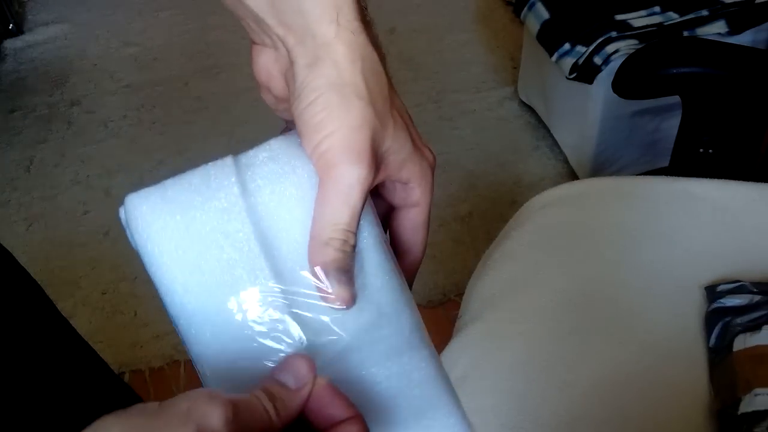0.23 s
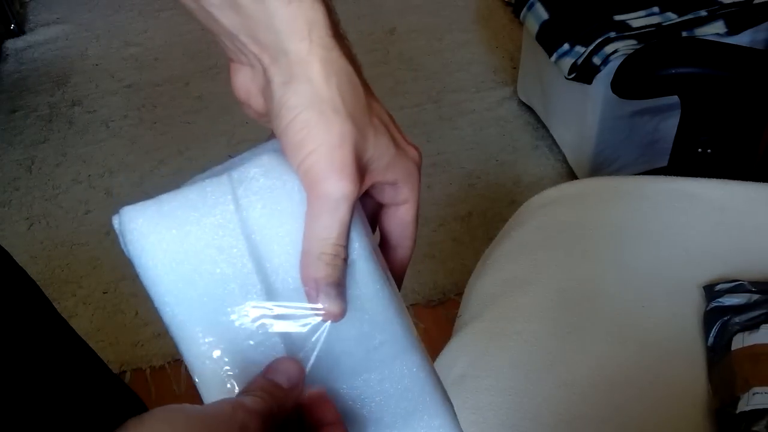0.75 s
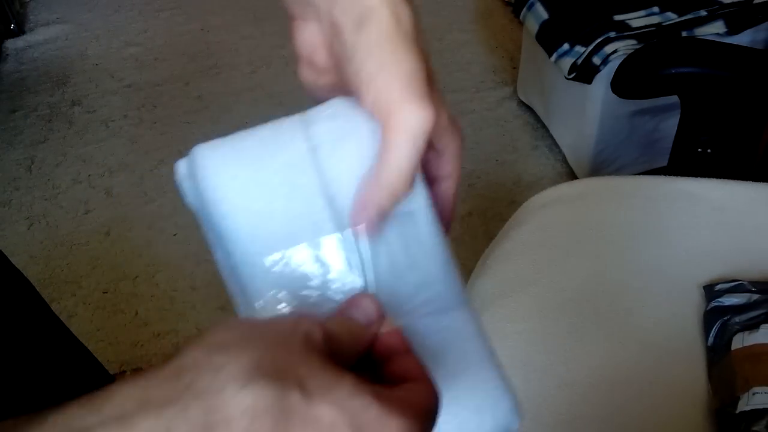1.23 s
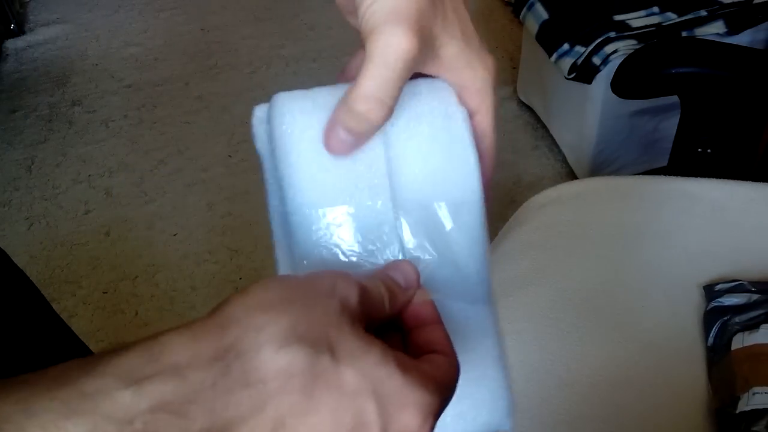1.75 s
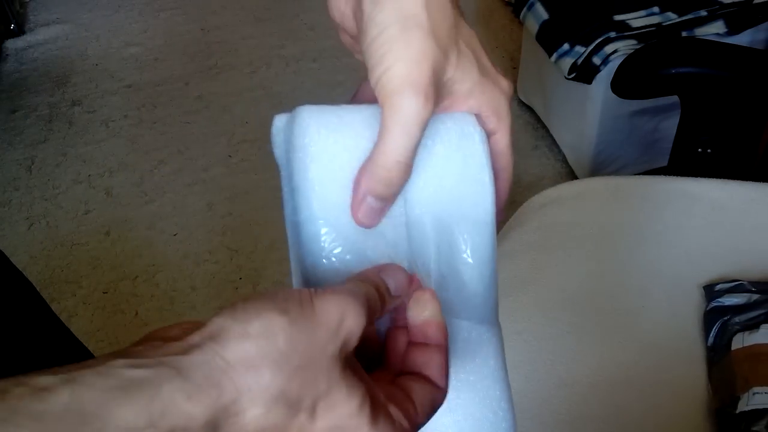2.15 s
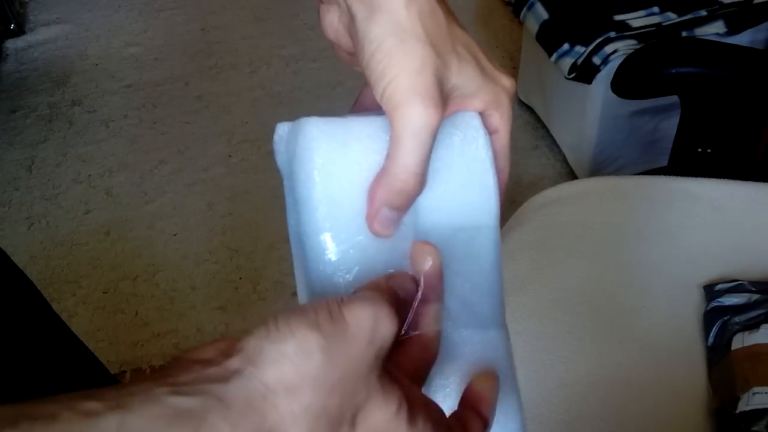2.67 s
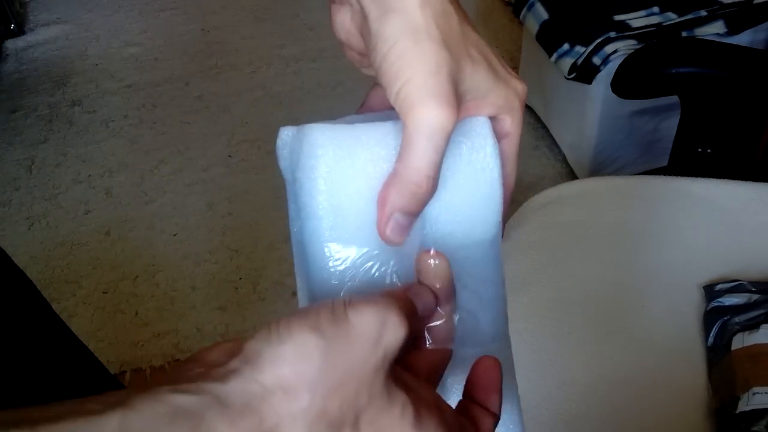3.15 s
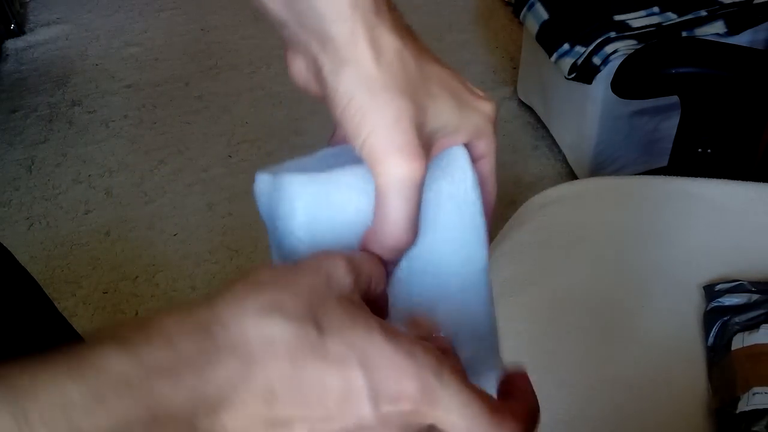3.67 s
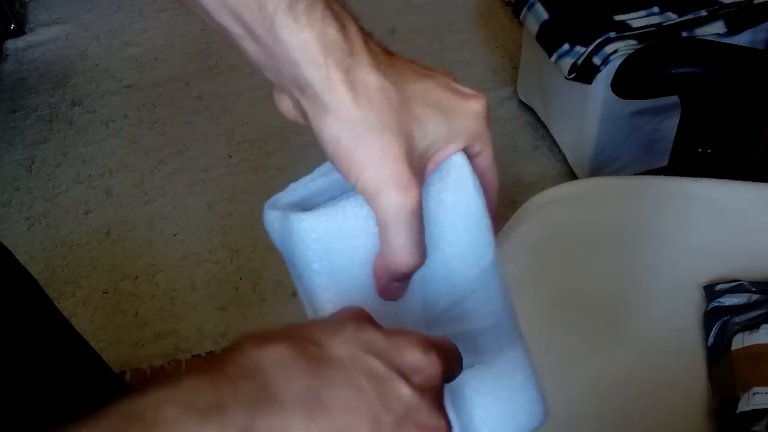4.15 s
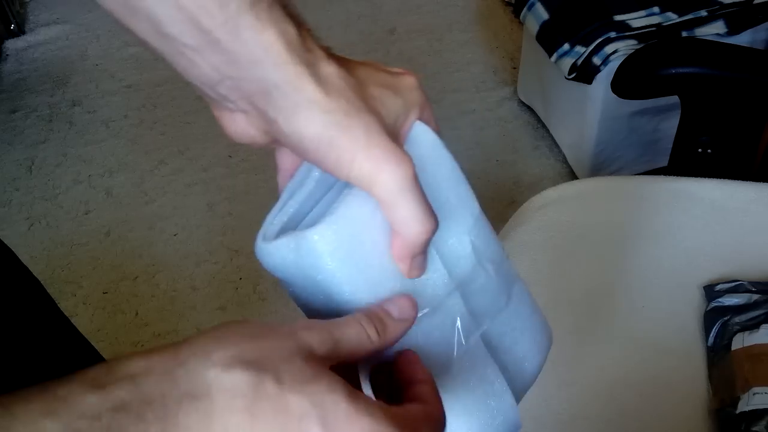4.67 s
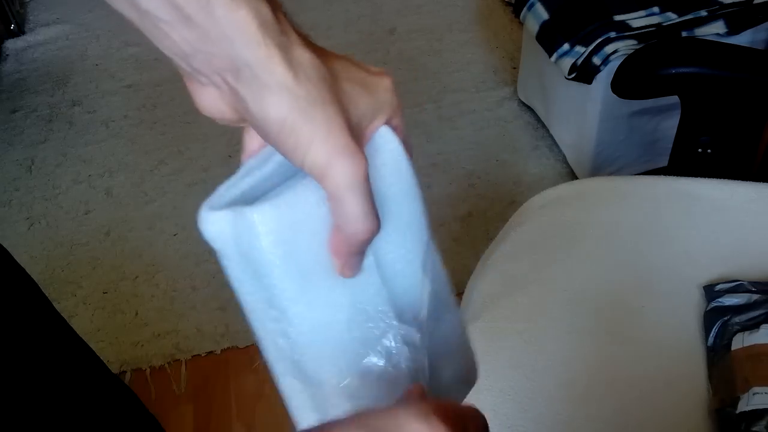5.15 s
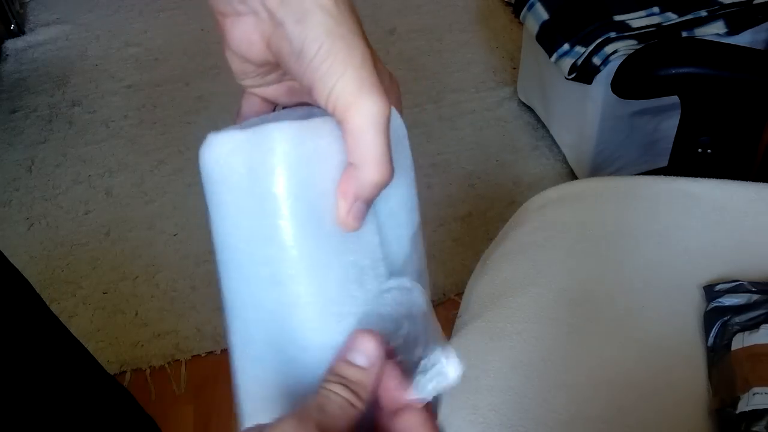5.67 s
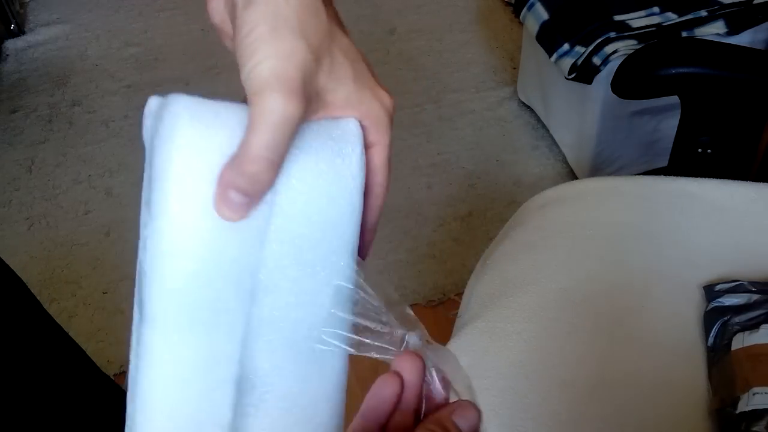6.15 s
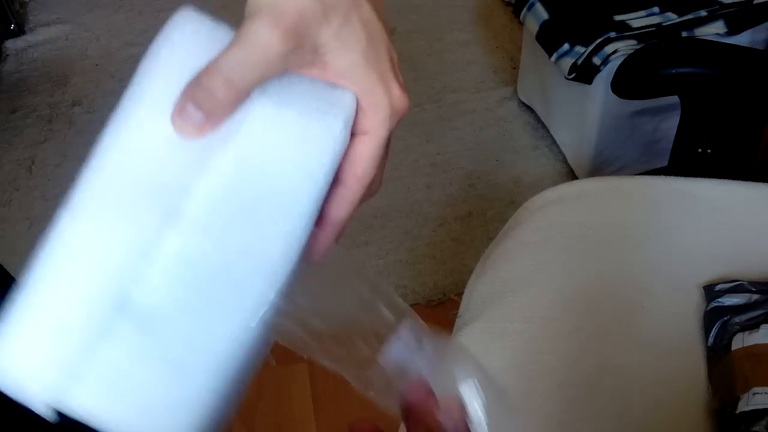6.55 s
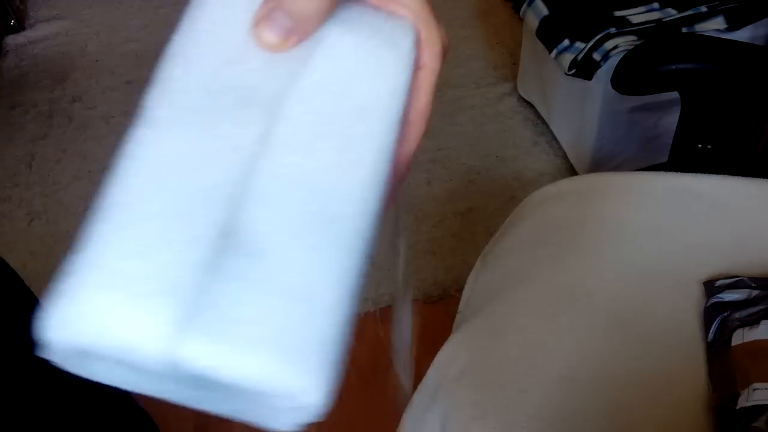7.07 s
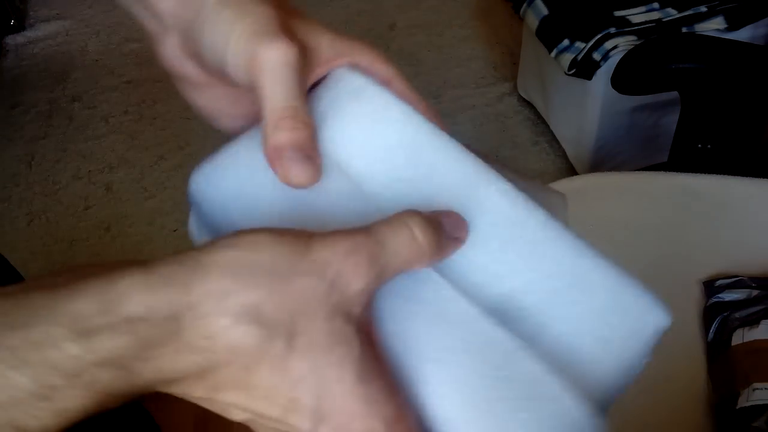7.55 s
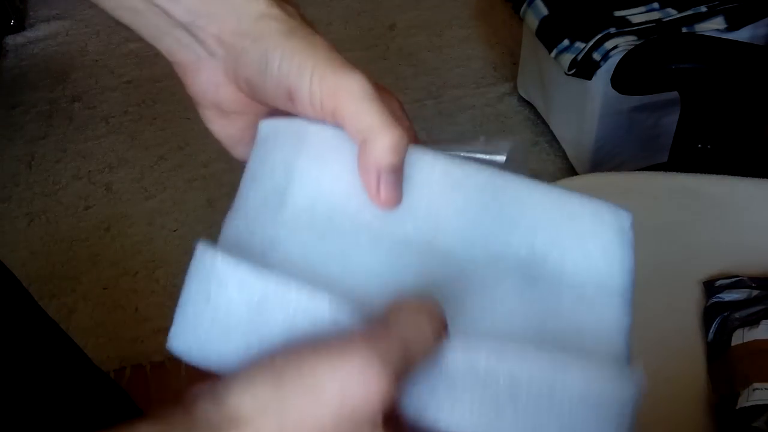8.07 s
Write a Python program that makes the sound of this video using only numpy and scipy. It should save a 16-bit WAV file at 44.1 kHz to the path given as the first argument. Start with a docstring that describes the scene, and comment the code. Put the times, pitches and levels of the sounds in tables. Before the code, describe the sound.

Close, uneven crackling and brief rips of tape pulled from foam packing, with soft hollow thumps in a small room.

```python
"""Peeling tape off a foam sleeve

A small soft-furnished room, a phone microphone half a metre from two hands peeling sticky tape.
The glue lets go in single snaps, loose crackle and dense rips; each release rings the tape film and
thumps the hollow sleeve. Nearby surfaces echo it about 10 ms later, over a quiet hiss."""
import sys
import numpy as np
from scipy import signal
from scipy.fft import rfft, irfft, next_fast_len
from scipy.io import wavfile
from scipy.ndimage import uniform_filter1d

SR = 44100
rng = np.random.default_rng(int(sys.argv[2]) if len(sys.argv) > 2 else 0)


def waveform_to_disk(signal):
    """Save audio, clipped to [-1, 1], as 16-bit WAV at the path in sys.argv[1]."""
    frames = np.transpose(np.atleast_2d(signal))
    scaled = np.clip(frames, -1, 1) * 32767
    samples = np.round(scaled).astype(np.int16)
    wavfile.write(sys.argv[1], SR, samples)


N = 366471


def undb(db):
    """Decibels to gain."""
    return 10 ** (np.asarray(db) / 20)


def highpass(x, hz):
    """Cut the bass at 18 dB per octave."""
    return signal.sosfilt(signal.butter(3, hz, "high", fs=SR, output="sos"), x)


def wander(per_s):
    """Random levels, each held 1 / per_s seconds and slewed; spread near 1."""
    hold = int(SR / per_s)
    return uniform_filter1d(np.repeat(rng.standard_normal(N // hold + 1), hold), hold // 2 + 1)[:N]


def ring(force, hz, width_hz):
    """One resonance whose pitch may move; a click of size 1 rings with a peak near 1."""
    turn = np.exp(2j * np.pi * np.cumsum(hz) / SR)
    # seen from the turning frame the ring is a plain decay
    return (turn * signal.lfilter([1], [1, -np.exp(-np.pi * width_hz / SR)], force / turn)).imag


# noise floor at the microphone: (frequency [Hz], relative spectral density [dB])
HISS_SPECTRUM = [(18, -30), (30, -3), (49, -4), (169, 2), (1270, -3), (1740, -3), (3910, -5), (6400, -8),
                 (8320, -38), (14100, -120)]


def hiss(rms_db=-69):
    """The steady, quiet noise floor under the handling."""
    hz, db = np.transpose(HISS_SPECTRUM)
    size = next_fast_len(N)
    bin_hz = np.maximum(np.arange(size // 2 + 1) * SR / size, 1)
    gain = undb(np.interp(np.log(bin_hz), np.log(hz), db))
    noise = irfft(rfft(rng.standard_normal(size)) * gain, size)[:N]
    return undb(rms_db) * noise / np.std(noise)


# surfaces close to the hands and the microphone: (delay [s], level [dB])
NEAR_ECHOES = [(.0011, -16), (.0017, -22.5), (.0045, -22), (.009, -15), (.011, -14)]
# low, middle and high band of the room's tail: (frequency [Hz], time to fall 60 dB [s], level [dB])
ROOM_TAIL = [(250, 0.15, -6.5), (1120, 0.24, -14), (3200, 0.19, -4.5)]


def reflections():
    """The room's answer at the microphone: a few near echoes and a short diffuse tail."""
    t = np.arange(SR // 3) / SR
    response = np.zeros(len(t))
    for delay, db in NEAR_ECHOES:
        response[int(delay * (1 + .04 * rng.standard_normal()) * SR)] += undb(db)
    build_up = np.clip(t / .0044, 0, 1) ** 2
    for kind, (hz, t60, db) in zip(("low", "band", "high"), ROOM_TAIL):
        edges = {"low": hz * 2, "band": [hz / 2, hz * 2], "high": hz / 2}[kind]
        band = signal.butter(2, edges, kind, fs=SR, output="sos")
        tail = signal.sosfilt(band, rng.standard_normal(len(t))) * undb(-60 * t / t60) * build_up
        response += tail * undb(db) * np.sqrt(2 * np.log(1000) / (t60 * SR))
    return response


def room(direct, block=8192):
    """The hands keep moving, so about every fifth of a second meets a new pattern of reflections."""
    at_mic = np.concatenate([direct, np.zeros(SR)])
    for i in range(0, N, block):
        echo = signal.fftconvolve(direct[i:i + block], reflections())
        at_mic[i:i + len(echo)] += echo
    return at_mic[:N]


# the sleeve jerks in the hand: (time [s], level of the push [dB])
HAND_PUSHES = [(1.484, -53), (3.199, -55), (3.962, -44.5), (5.52, -57), (6.006, -46), (6.019, -48),
               (6.625, -49), (6.812, -44), (6.861, -35), (7.242, -45), (7.679, -61), (7.741, -54),
               (7.878, -48)]
# slow flexing of the whole sleeve: (frequency [Hz], bandwidth [Hz], level [dB])
FLEX_MODES = [(124, 54, -3), (187, 75, 0.5)]


def sleeve_jerks(push_s=.0037):
    """A soft push of the hand sets the whole sleeve flexing."""
    force = 1e-9 * rng.standard_normal(N)
    push = np.hanning(int(push_s * SR))
    for s, db in HAND_PUSHES:
        start = int(s * SR)
        force[start:start + len(push)] += undb(db) * push / push.sum()
    flex = sum(undb(db) * ring(force, np.full(N, hz), width) for hz, width, db in FLEX_MODES)
    return highpass(highpass(flex, 110), 80)


# the sleeve's pitch follows the grip and the place where the tape pulls: (time [s], pitch [Hz])
SLEEVE_PITCH = [(0, 500), (2.7, 593), (3.999, 465), (4.72, 425), (5.25, 620), (5.37, 470), (5.98, 370),
                (6.38, 624), (6.84, 403), (8.3, 414)]
# ring of the hollow sleeve: (multiple of its pitch [ratio], bandwidth [Hz], level [dB])
SLEEVE_MODES = [(.7, 135, -7), (1, 195, 2), (1.4, 288, -3.5)]


def sleeve_thumps(at, forces, thump_db):
    """Each click thumps the hollow foam, which is too small to radiate bass."""
    pitch_hz = np.interp(np.arange(N) / SR, *np.transpose(SLEEVE_PITCH))
    sleeve = np.zeros(N)
    for (multiple, width, db), force in zip(SLEEVE_MODES, forces):
        clicks = np.bincount(at, force * undb(db + thump_db), N)[:N]
        sleeve += ring(clicks, multiple * pitch_hz, width)
    return highpass(sleeve, 269)


# ring of the stretched tape film: (frequency [Hz], bandwidth [Hz], level [dB])
FILM_MODES = [(1020, 680, -3), (1610, 640, -5), (2560, 730, -2), (3195, 960, -7), (3985, 610, -3.5),
              (5510, 1700, -8), (5900, 850, -3)]


def film_ring(at, forces, treble_db):
    """Each click rings the thin film; its tension changes, so the pitch wanders."""
    film = np.zeros(N)
    for (hz, width, db), force in zip(FILM_MODES, forces):
        treble_share = np.clip(np.log(hz / 2000) / np.log(5700 / 2000), 0, 1)
        clicks = np.bincount(at, force * undb(db + treble_share * treble_db), N)[:N]
        film += ring(clicks, hz * np.exp(.073 * wander(per_s=23)), width)
    return highpass(film, 1000)


# fingers rubbing foam and tape: (time [s], level [dB])
FINGER_RUB = [(0.0, -71.5), (0.42, -76.5), (0.67, -82.5), (1.55, -73.5), (1.75, -65), (1.9, -91),
              (2.16, -69), (2.75, -89), (3.3, -66.5), (3.89, -75), (4.75, -76.5), (5.85, -80), (6.11, -73),
              (6.5, -72), (6.74, -57), (6.94, -91), (7.85, -74.5), (8.31, -80)]
# dense rips of tape: (start [s], rise [s], length [s], level [dB], sleeve thump re that level [dB])
TAPE_RIPS = [(0.12, 0.01, 0.047, -52, -26), (0.207, .01, .1, -65, -27), (0.337, .01, 0.1, -56.5, -33),
             (.45, .01, 0.16, -59.5, -30), (1.23, .008, 0.15, -58.5, -37), (1.971, 0.0083, 0.012, -56, -4),
             (2.594, .01, 0.031, -51, -12.5), (2.89, 0.0036, 0.04, -48, -20),
             (3.12, 0.024, 0.16, -62.5, -17), (3.413, .004, 0.029, -42.5, -20),
             (3.817, .006, 0.2, -56, -17), (3.96, 0.0068, 0.033, -48.5, -4.5),
             (4.302, .01, 0.082, -42.5, -31), (4.439, .01, 0.14, -54.5, -35), (4.648, .01, 0.16, -57, -23),
             (5.024, 0.016, 0.046, -58, -14), (5.198, .005, 0.037, -52.5, -23),
             (5.227, 0.051, .18, -34.5, -11.5), (5.895, .01, 0.067, -56, -16),
             (5.954, 0.012, 0.082, -43, 0.5), (6.27, .01, 0.11, -59.5, -16),
             (6.559, 0.095, 0.13, -51.5, -15.5), (6.75, 0.033, 0.1, -42.5, -10.5),
             (6.796, 0.028, 0.082, -30, -7.5), (7.182, 0.079, 0.087, -49.5, -13.5),
             (7.731, 0.035, 0.25, -63.5, -13.5), (8.227, 0.073, .1, -62, -9)]


def crackle(clicks_per_s=3000, rub_thump_db=-13.5, rub_dulling_db=6.5):
    """Tiny clicks: fairly even while fingers rub the foam, in rough flurries while tape rips."""
    t = np.arange(N) / SR
    rub = undb(np.interp(t, *np.transpose(FINGER_RUB)))
    film_drive, sleeve_drive = rub.copy(), rub * undb(rub_thump_db)
    for start, rise, length, db, thump_db in TAPE_RIPS:
        # a rip catches at once, swells, holds and fades
        held = (rise + length) / 2
        swell = np.interp(t - start, [0, .002, rise, held, length], [0, .29, 1, 1, 0]) * undb(db)
        film_drive += swell
        sleeve_drive += swell * undb(thump_db)
    at = np.flatnonzero(rng.random(N) < clicks_per_s / SR)
    rub_share = rub / film_drive
    # slow peeling stutters in single ticks, a fast rip evens out and brightens
    speed_db = 20 * np.log10(film_drive) + 60
    rough_db = 1.2 + (1 - rub_share) * np.clip(2.7 - .048 * speed_db, 0, 2.8)
    power_trim = np.sqrt(1 - rough_db * np.log(10) / 10)  # offsets the power that roughness adds
    flurry = .7 * wander(per_s=90)
    spikes = np.minimum(rng.exponential(size=N), 5.5)
    size = film_drive * power_trim * undb(rough_db * (spikes + flurry))
    thump_db = 20 * np.log10(sleeve_drive / film_drive)
    treble_db = .099 * speed_db - rub_dulling_db * rub_share  # skin on foam is duller than tearing glue
    # the place of contact wanders, so the colour comes in patches
    colour_db = [2.2 * rng.standard_normal(len(at)) + 1.9 * wander(per_s=22)[at]
                 for _ in FILM_MODES + SLEEVE_MODES]
    return at, size[at], thump_db[at], treble_db[at], np.array(colour_db)


USUAL_THUMP_DB = -19  # sleeve relative to film in a typical snap


def stray_snaps(per_s=22, max_over_rub_db=21.5, range_db=10):
    """Small snaps at random while the fingers work, following the level of the rubbing."""
    wait, weakness, thump = rng.random((200, 3 + 1)).T[:3]
    s = np.cumsum(-np.log(1 - wait)) / per_s
    db = np.interp(s, *np.transpose(FINGER_RUB)) + max_over_rub_db - range_db * weakness
    thump_db = USUAL_THUMP_DB + 16 * (thump - .5)
    return np.column_stack([s, db, thump_db])[s < N / SR - .01]


# single releases of the glue: (time [s], level [dB], sleeve thump re that level [dB])
GLUE_SNAPS = [(.1241, -39.5, -18), (.2036, -27, -21.5), (.2303, -30.5, -25), (.3066, -36.5, -36),
              (.3505, -26.5, -32), (.3657, -28.5, -20.5), (.405, -34, -23), (.4147, -31, -40),
              (.458, -37, -19.5), (.4838, -33.5, -18), (.4988, -39, -32), (.545, -40.5, -12),
              (.5647, -49, -29), (.5765, -37.5, -22), (.6488, -47, -15), (.72, -51, -14), (.79, -51.5, -9),
              (1.0022, -36, -21), (1.1083, -40.5, -22), (1.1406, -46, -14), (1.2492, -41.5, -71),
              (1.274, -44, -45), (1.3138, -40, -47), (1.3198, -34, -32), (1.411, -36, -19),
              (1.4441, -44.5, -22), (1.492, -25, -16), (1.507, -34.5, -13.5), (1.6486, -34.5, -31),
              (1.706, -50.5, -36), (1.8695, -44, -18), (1.9307, -45.5, -13), (1.9802, -39, -12),
              (2.0967, -46, -11), (2.1348, -51, -11), (2.2255, -44.5, -18), (2.2976, -44.5, -12),
              (2.3116, -46.5, -37), (2.362, -50, -28), (2.3931, -41, -43), (2.4461, -37, -20),
              (2.4744, -48.5, -27), (2.59, -47, -19), (2.6552, -42.5, -24), (2.7268, -31, -7.5),
              (2.8954, -41, -28), (2.908, -35, -26), (2.991, -47, -20), (3.0573, -45.5, -25),
              (3.125, -41.5, -30), (3.1501, -34.5, -15.5), (3.1931, -34, -39), (3.2075, -32.5, -15),
              (3.2691, -39, -18), (3.3416, -49.5, -18), (3.388, -29, -30), (3.432, -12, -27),
              (3.5373, -9.5, -21.5), (3.793, -45.5, -31), (3.829, -38.5, -34), (3.8592, -34, -32),
              (3.8958, -40, -19), (3.9521, -39.5, -14), (3.9682, -24, -13.5), (3.9793, -26.5, -24),
              (4.057, -44, -8.5), (4.069, -44, -15), (4.145, -51.5, -10), (4.292, -44, -19),
              (4.3068, -37, -22.5), (4.3182, -25, -32), (4.3267, -32.5, -30), (4.3477, -38, -23),
              (4.3696, -37, -33), (4.4334, -37, -60), (4.4585, -45, -33), (4.4898, -23.5, -39),
              (4.529, -34.5, -23), (4.66, -40.5, -20.5), (4.6828, -39, -26), (4.7156, -21.5, -9),
              (4.8133, -47.5, -25), (5.2017, -49, -22), (5.2355, -31, -5.5), (5.4615, -42, -19),
              (5.528, -40.5, -6), (5.8871, -46.5, -25), (5.9063, -36, -9), (5.942, -36, -22),
              (5.9585, -31, -7.5), (5.969, -27.5, -10), (5.9913, -24.5, -5.5), (6.0048, -24, -14),
              (6.0154, -23.5, -20), (6.0682, -33.5, -18), (6.0975, -38, -24), (6.138, -51, -31),
              (6.1961, -42.5, -49), (6.2258, -51, -17), (6.2378, -40, -26), (6.2724, -39, -32),
              (6.286, -38, -21), (6.3131, -37.5, -16), (6.3334, -44, -2), (6.3748, -34.5, -4.5),
              (6.4044, -47, -17), (6.5284, -41.5, -10.5), (6.551, -45, -20), (6.5772, -43, -35),
              (6.6096, -33, -12), (6.6385, -32.5, -10), (6.6627, -28.5, -13), (6.6832, -38, -31),
              (6.6954, -36, -30), (6.7163, -32, -7.5), (6.7567, -35, -9.5), (6.7743, -30, -25),
              (7.101, -49, -18), (7.2368, -29.5, -18), (7.2496, -32.5, -0.5), (7.4917, -46, -18),
              (7.69, -45, -6), (7.7476, -47, -6.5), (7.8112, -38.5, -12), (7.8419, -38.5, -13),
              (7.885, -43, -4), (7.9664, -49.5, -13)]


def snaps(threads=6, gap_s=.0006, rise_db=8.5, fall_db=6.5):
    """In each snap a few glue threads break in about 3 ms, swelling to the main break and dying away."""
    rows = np.concatenate([GLUE_SNAPS, stray_snaps()])
    # a snap that thumps the foam more rings the top of the film less
    treble_db = -1 - .2565 * (rows[:, 2] - USUAL_THUMP_DB) + 3.5 * rng.standard_normal(len(rows))
    s, db, thump_db, treble_db = np.repeat(np.column_stack([rows, treble_db]), threads, axis=0).T
    step = np.tile(np.arange(threads) - threads / 2 + .5, len(rows))  # the main break is at -0.5
    thread_db = np.where(step < 0, rise_db * (step + .5), -fall_db * step)
    break_s = s + gap_s * (step + rng.random(len(s)) - .5)
    at = np.maximum((break_s * SR).astype(int), 0)
    colour_db = 1.84 * rng.standard_normal((len(s), len(FILM_MODES + SLEEVE_MODES))).T
    return at, undb(db + thread_db), thump_db, treble_db, colour_db


def peeling_tape():
    """Snaps and crackle ring film and sleeve; each click lands elsewhere and weights the modes anew."""
    clicks = (np.concatenate(pair, axis=-1) for pair in zip(snaps(), crackle()))
    at, size, thump_db, treble_db, colour_db = clicks
    forces = size * undb(colour_db) * rng.choice([-1, 1], colour_db.shape)  # one row per mode
    on_film, on_sleeve = np.split(forces, [len(FILM_MODES)])
    return film_ring(at, on_film, treble_db) + sleeve_thumps(at, on_sleeve, thump_db)


def scene():
    """Tape and sleeve half a metre away in the small room, over steady hiss; mono."""
    return (room(peeling_tape() + sleeve_jerks()) + hiss())[None]


def record(dry):
    """The phone microphone rolls off steeply above 6753 Hz and cuts the top above 7550 Hz."""
    rolled_off = signal.sosfilt(signal.cheby1(8, .5, 6753, fs=SR, output="sos"), dry)
    return signal.sosfilt(signal.ellip(8, .2, 40, 7550, fs=SR, output="sos"), rolled_off)


dry = scene()
out = record(dry)
waveform_to_disk(out)
```